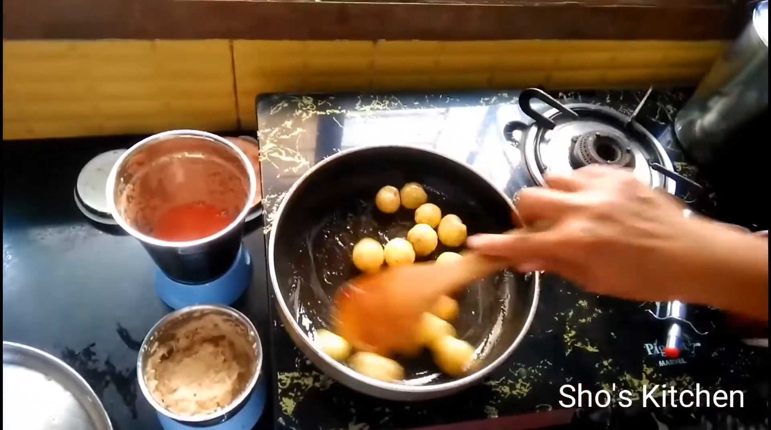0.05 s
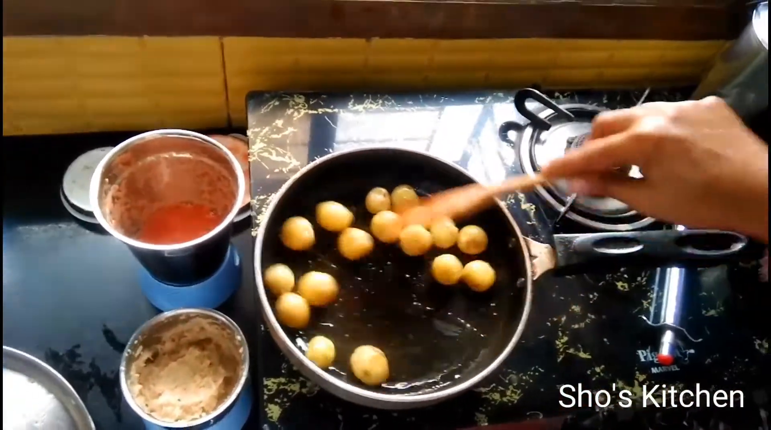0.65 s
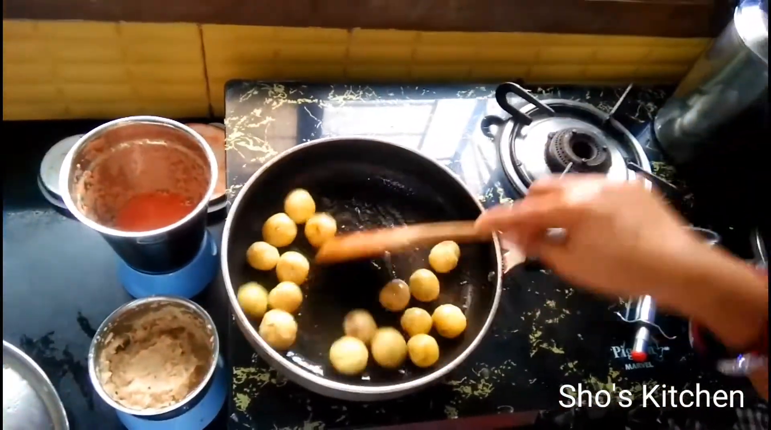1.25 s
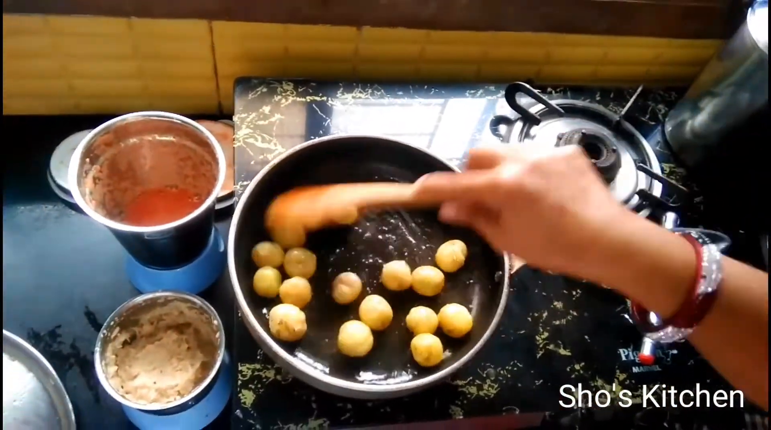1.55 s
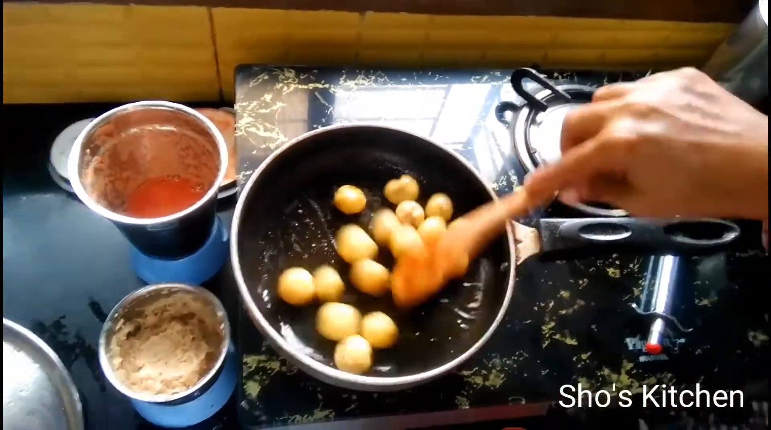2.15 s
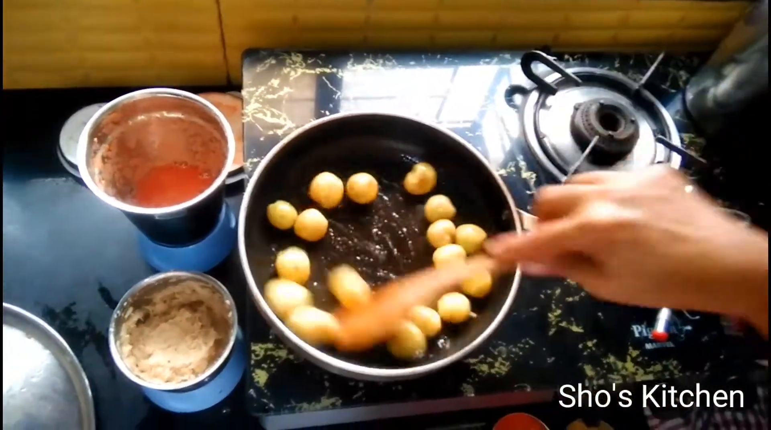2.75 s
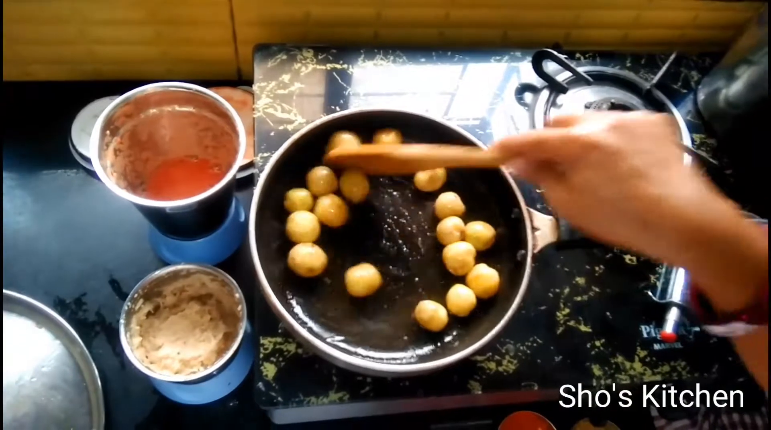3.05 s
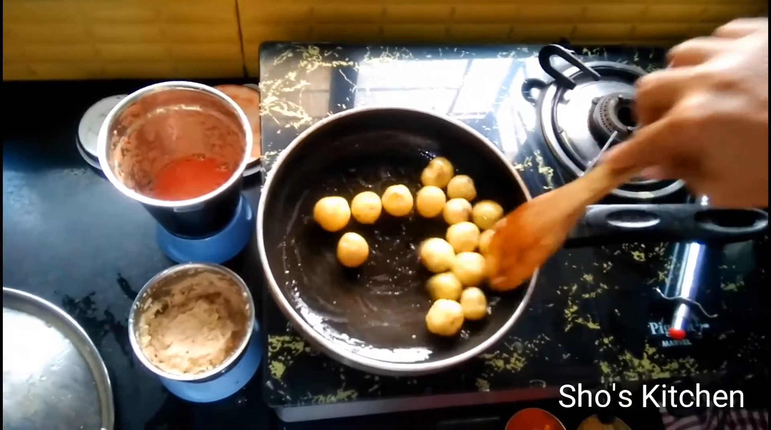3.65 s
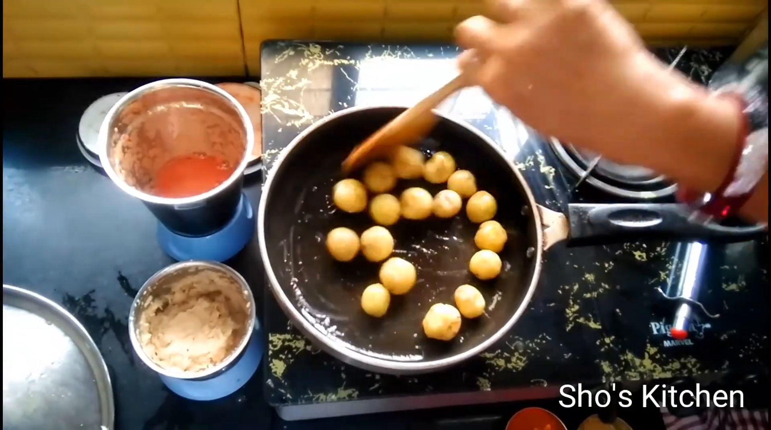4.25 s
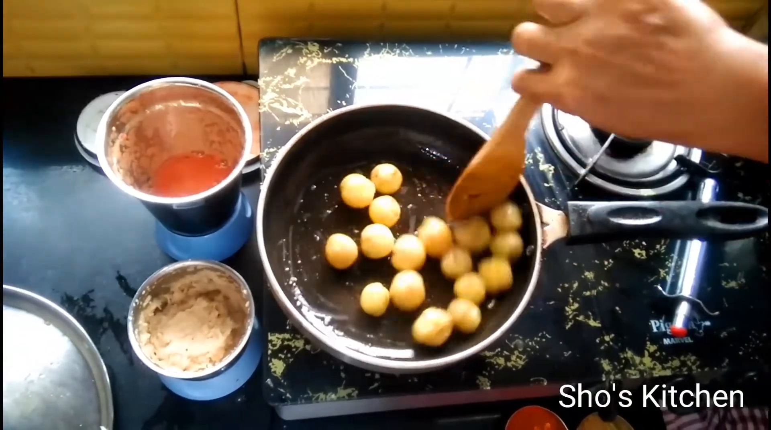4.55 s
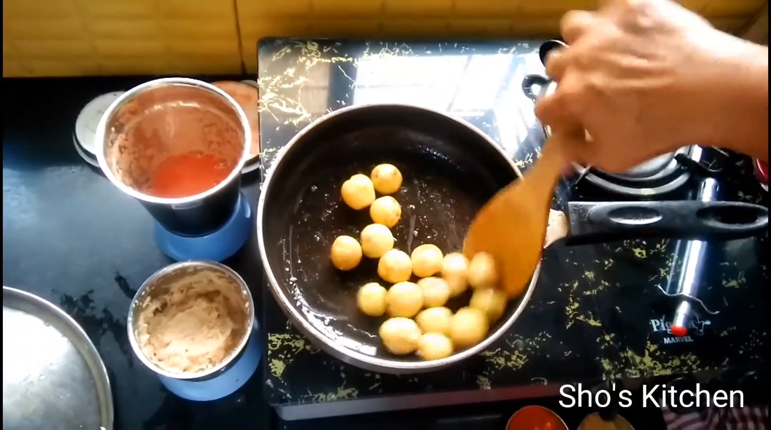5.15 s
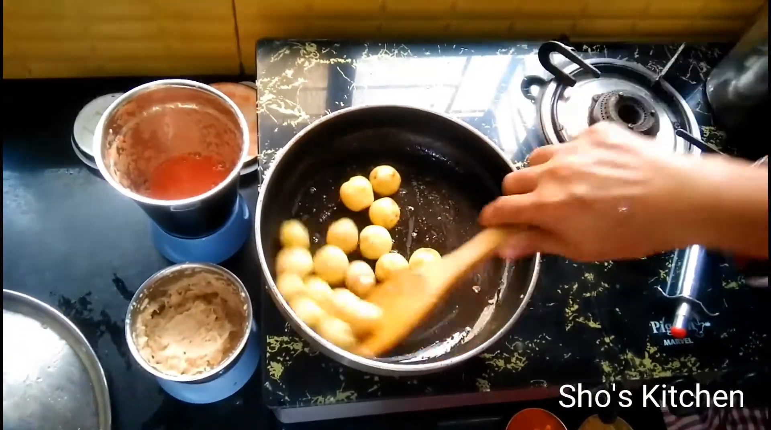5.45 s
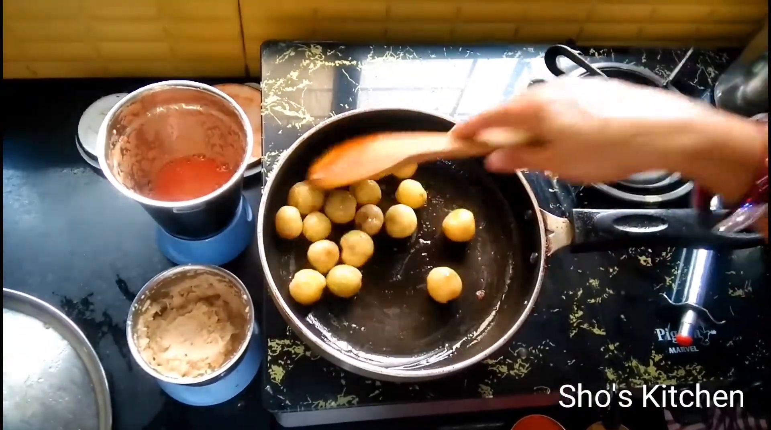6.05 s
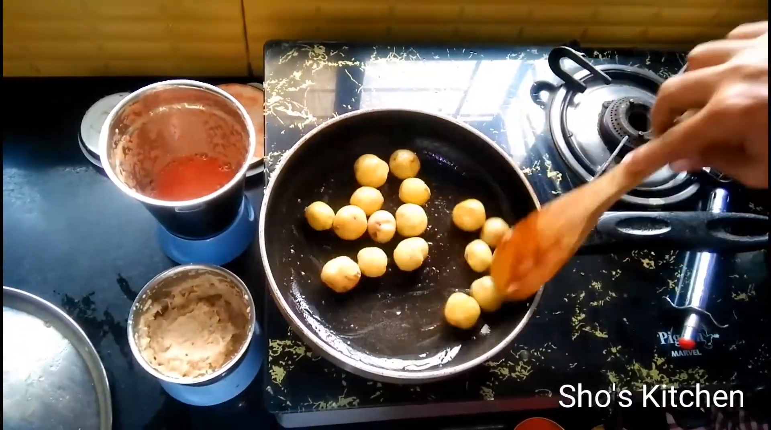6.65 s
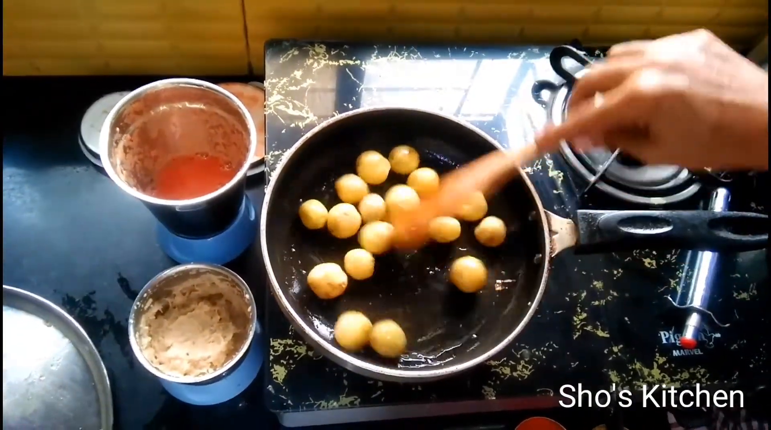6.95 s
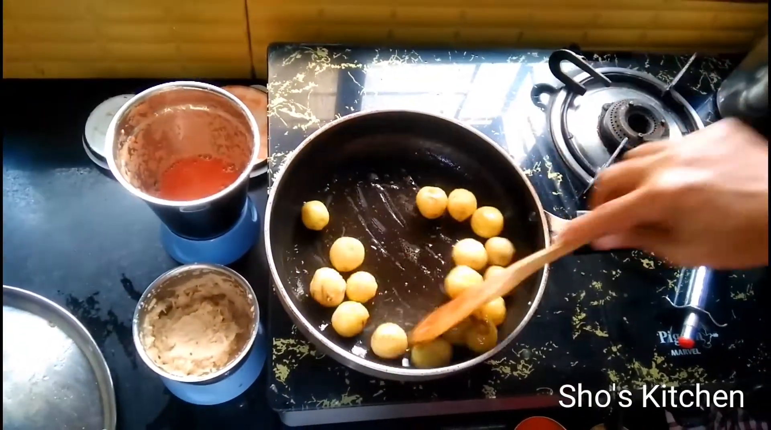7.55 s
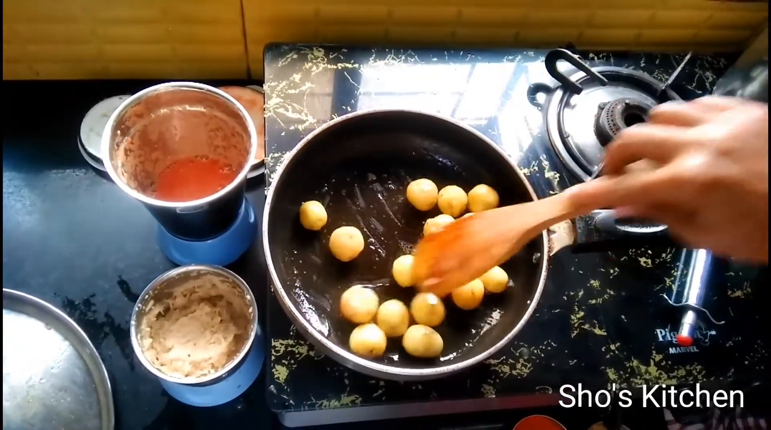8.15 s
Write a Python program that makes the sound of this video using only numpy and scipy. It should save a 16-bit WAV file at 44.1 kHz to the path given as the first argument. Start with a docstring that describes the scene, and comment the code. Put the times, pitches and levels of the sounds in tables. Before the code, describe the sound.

Potatoes fry in a pan, heard up close with the short echo of a small kitchen. From the start, hot fat gives a fine, high fizz with frequent snapping spits and sputters. A wooden spatula pushes the potatoes around two or three times a second, making wet rasps, light scrapes and soft, low tumbling bumps. Dull knocks on the pan wall come irregularly, the clearer ones near 0.6, 1.3, 2.2, 2.9, 3.3 and 4.2 seconds. At 4.7 seconds the wood clacks hard on the rim with a brief metallic ring, the loudest moment, followed by a cluster of duller knocks until 5.2. Stirring continues over slightly calmer fat, with another firm knock at 6.9. Near 7.7 seconds the pan rumbles on its stand and a last knock leaves the iron ringing faintly. Soft pushes and sizzling carry on to about 8.5 seconds.

```python
"""Boiled potatoes fry in ghee in a small kitchen. From the start the fat fizzes, and it spits and
flares as wet sides meet the hot metal, while a wooden spatula pushes the potatoes round with a wet
rasp, scraping the base and knocking dully on the wall. At 4.7 s the wood clacks hard on the rim.
The stirring goes on over calmer fat; near 7.7 s the pan rumbles on its stand, a last knock leaves
the iron ringing faintly, and the final pushes are soft."""
import sys
import numpy as np
from scipy import signal
from scipy.fft import rfft, irfft, next_fast_len
from scipy.io import wavfile
from scipy.ndimage import uniform_filter1d, map_coordinates

SR = 44100
rng = np.random.default_rng(int(sys.argv[2]) if len(sys.argv) > 2 else 0)


def master_out(mix):
    """Clip the mix to full scale and print it as 16-bit PCM to the path in sys.argv[1]."""
    frames = np.transpose(np.atleast_2d(mix))
    ceiling = np.clip(frames, -1, 1)
    pcm = np.round(ceiling * 32767).astype(np.int16)
    wavfile.write(sys.argv[1], SR, pcm)


N = 366905
T = np.arange(SR // 3) / SR  # time within one event

# Table levels are relative: each layer adds its own trim.
# The room's decay. Each row: frequency in Hz, time to fall by 60 dB in seconds.
ROOM_DECAY = [(200, 0.57), (1000, 0.68), (4000, 0.62), (12000, 0.16)]
# The pan shifting on its stand. Each row: time in seconds, rumble level in dB.
RUMBLE_LEVELS = [(0, -52.5), (.6, -58), (.85, -48.5), (1.3, -56.5), (1.55, -50), (2.3, -55.5), (2.42, -64),
                 (2.5, -55), (2.9, -54.5), (3.02, -43), (3.35, -57), (3.87, -48.5), (4.1, -54),
                 (5.6, -56.5), (6.4, -55), (7.52, -57), (7.67, -35.5), (7.95, -52.5), (8.32, -55)]
# The fat calming as the potatoes dry. Each row: time in seconds, fizz level in dB.
FIZZ_LEVELS = [(0.0, -41.5), (0.9, -46), (1.25, -43), (1.88, -45), (2.01, -45.5), (2.64, -47), (3.47, -46),
               (4.1, -46.5), (4.84, -46.5), (5.21, -53), (5.93, -46.5), (6.07, -53), (6.79, -46),
               (7.16, -52.5), (7.53, -48), (8.32, -52)]

# EQ curves. Each row: frequency in Hz, gain in dB.
STOVE_EQ = [(20, -29), (36, -39), (50, -4), (62, 3.5), (76, -8), (100, -10), (130, -14), (200, -16.5),
            (500, -73)]  # deep rumble under the pan
TUMBLE_EQ = [(90, -30), (140, -16.5), (187, 4.5), (228, -20), (266, 2.5), (330, -7), (410, -10), (600, -12),
             (1000, -22), (2000, -44)]  # soft bumps of potatoes
FIZZ_EQ = [(1200, -21), (3000, -42), (4500, -5.5), (6000, 3), (7000, 1.5), (8500, -1.5), (11000, -6),
           (12500, -4.5), (14000, -3)]  # fine steam bubbles
SIZZLE_EQ = [(700, -24), (1500, -18.5), (2400, -9.5), (3200, -5.5), (4400, -2.5), (5500, -2), (6600, -2),
             (7600, -6.5), (9000, -14), (11000, -21), (14000, -17.5)]  # coarse, wet pops
SCRAPE_EQ = [(250, -9.5), (450, -7), (650, -2), (950, 6), (1140, 3.5), (1300, 5.5), (1900, -0.5),
             (2400, -1.5), (3100, 3), (4200, -14), (6000, 6), (10000, -31)]  # wood dragged over metal
THUD_EQ = [(100, -37), (200, -1.5), (420, 5.5), (620, -3.5), (1000, 3), (1400, -9), (1900, 0), (2600, -0.5),
           (5000, -15.5)]  # wood in a dull knock
CRACK_EQ = [(290, -68), (500, -25), (720, -18), (1160, -31.5), (1670, -12), (1970, -21), (2470, -8.5),
            (2840, -12), (3090, -4), (4570, -13), (5560, -0.5), (7560, -11), (9870, -11.5), (12000, -26),
            (14200, -18.5)]  # wood in a hard hit

# Ringing metal. Each row: frequency in Hz, level in dB, time to fall by 60 dB in seconds.
PAN_MODES = [(194, -13, 0.7), (261, -2, 0.27), (377.3, -12, 0.29), (412, -6.5, 0.33), (485, -14.5, 0.45),
             (716, -12, 0.38), (993, -18, 0.12), (988, -1.5, 0.016), (1147.5, 2.5, 0.13),
             (1422, -3.5, 0.051), (1640, -16, 0.021), (1829, -1, 0.059), (1860, 1, 0.078),
             (2156, -1, 0.052)]  # the body on its stand
RIM_MODES = [(704, -10, .2), (1630, -9, .2), (3004, -4, .17), (3213, -5, .17), (3920, -6, .15),
             (4010, -6, .15), (5090, -1, .17), (5330, -2, .15), (5465, 1, .2), (5580, 0, .15),
             (5985, -2, .15), (6177, -2, .17), (6410, 0, .17), (6548, -1, .17), (8909, -11, .15),
             (9517, -10, .15)]  # the bright rim

# Spatula pushes. Each row: start and length in seconds, rasp, scrape and rolling levels in dB,
# pitch of the rasp in Hz.
PUSHES = [(0.0, 0.33, -26.5, -49.5, -52.5, 5670), (0.423, 0.26, -28, -47.5, -53.5, 5350),
          (0.801, 0.19, -36, -51, -55, 5300), (1.047, 0.32, -35, -47.5, -55.5, 6070),
          (1.395, .24, -32.5, -48, -63, 5330), (1.763, 0.14, -36.5, -49.5, -51.5, 5460),
          (2.22, .1, -35, -68, -55.5, 4720), (2.71, 0.22, -41.5, -64, -53.5, 5840),
          (2.92, 0.43, -38.5, -58.5, -48, 5770), (3.582, 0.19, -35.5, -57.5, -63.5, 5770),
          (3.887, 0.049, -38, -66, -63, 5380), (4.358, 0.38, -35.5, -53, -51, 5760),
          (4.873, 0.46, -39, -47, -48, 5250), (5.712, 0.074, -39, -55.5, -56.5, 5800),
          (5.906, 0.14, -37.5, -50, -55, 5680), (6.192, 0.25, -37.5, -44.5, -46, 5450),
          (6.54, 0.13, -34, -55, -52.5, 5170), (6.82, 0.25, -39, -54, -52, 5720),
          (7.42, 0.15, -46.5, -57, -57, 4850), (7.586, 0.41, -54, -51, -50.5, 5470),
          (8.13, 0.31, -54, -56.5, -56.5, 6200)]
# What coasts on after a push. The three values: rasp, scrape and rolling in dB against the push.
COASTING_DB = [-9, -10, -7.5]
# Quick swipes of the edge. Each row: peak time in seconds, level in dB, swell and fade time constant
# in seconds, pitch in Hz, low rub in dB against the swish.
EDGE_SWIPES = [(.94, -41, 0.015, 2900, -9.5), (1.119, -44.5, .033, 4050, -24),
               (1.436, -32, 0.016, 4770, -24), (1.866, -37, 0.0076, 3180, -1),
               (2.253, -35.5, 0.023, 4620, -29), (5.339, -31.5, .012, 4100, -21),
               (6.391, -32.5, 0.017, 3770, -7.5), (7.46, -40, 0.048, 5000, -9),
               (7.93, -45.5, 0.021, 3240, 1)]
# Dull blows on the pan. Each row: start in seconds, level in dB, treble cut-off in Hz,
# low thump gain in dB, pitch of the tap in Hz.
WALL_KNOCKS = [(.486, -36.5, 643, 3, 476), (.579, -29.5, 720, 9.5, 405), (.6, -39, 495, 19, 307),
               (1.2821, -26.5, 1380, -4.5, 1152), (1.679, -40.5, 1010, 0, 409), (1.817, -38, 1140, 22, 382),
               (2.158, -28, 2630, 2, 1006), (2.493, -36.5, 244, 16, 172), (2.874, -24.5, 2320, -1.5, 1130),
               (3.181, -38.5, 1400, 1, 990), (3.272, -27, 1820, -5, 983), (4.2087, -24.5, 1360, -5, 1131),
               (4.581, -35.5, 713, 2, 342), (4.892, -29.5, 1750, 7, 500), (4.93, -28, 1600, 2, 300),
               (5.109, -23, 2040, -5, 1455), (5.115, -25.5, 390, 7, 269), (5.154, -31.5, 1610, -2, 270),
               (5.195, -27.5, 1750, 2, 1380), (5.669, -51, 2100, -3, 1920), (6.15, -39.5, 820, -8, 454),
               (6.784, -40.5, 500, 18, 272), (6.907, -21.5, 2980, 2.5, 1955),
               (7.7248, -23, 1770, -4.5, 414)]
# The spatula chattering on the rim. Each row: start in seconds, level in dB.
RIM_HITS = [(4.7018, -10), (4.7072, -7), (4.7145, -17), (4.7285, -39), (4.7392, -18)]
# Wet spots meeting hot fat. Each row: start in seconds, snap, sputter and flare levels in dB.
BIG_SPITS = [(.0961, -23, -29.5, -48), (.1788, -18, -31.5, -58), (.426, -25, -30, -51),
             (.4358, -18, -35, -40), (.5773, -22, -29.5, -49), (.6275, -18, -43, -38.5),
             (.8702, -17.5, -27.5, -58), (1.1014, -26, -43, -44.5), (1.2084, -31, -30.5, -43),
             (1.5252, -20, -29, -52), (1.6158, -16.5, -29, -59), (1.7879, -23, -33, -41),
             (1.9879, -26, -49, -38.5), (2.144, -38, -41, -37.5), (2.3903, -28, -41, -38),
             (2.7306, -28, -33.5, -38), (3.079, -23, -32.5, -42), (3.261, -20.5, -37, -43),
             (3.321, -28, -29, -40), (3.4207, -26, -30.5, -52), (3.4664, -23.5, -36, -41.5),
             (3.6066, -20, -29, -45), (3.664, -28, -28.5, -42), (3.917, -26, -32, -64),
             (3.9502, -24, -40, -59), (3.9948, -27, -40, -41), (4.389, -16, -28.5, -52),
             (4.4267, -32, -26, -41.5), (4.461, -21, -36, -50), (4.5348, -20.5, -43, -61),
             (4.9265, -25, -41, -64), (4.9685, -38, -30, -50), (5.458, -38, -37, -44),
             (5.7344, -34, -36.5, -43.5), (5.9199, -35, -32, -39.5), (5.9446, -24, -34, -60),
             (5.9837, -24.5, -40, -44), (6.3508, -27, -40, -51), (6.551, -25, -32, -46),
             (6.7865, -41, -45, -43), (6.865, -31, -28.5, -46), (7.634, -38, -44, -47),
             (7.7875, -24.5, -37, -46.5), (7.9, -42, -40, -44)]

PUSH_ATTACK_S, PUSH_T60_S, COAST_T60_S = 0.023, 0.37, 3.7
SPIT_PITCH_SCATTER = 0.043  # share of the rasp's pitch
SMALL_SPITS_PER_S = 5
SMALL_SNAP_DB, SMALL_SPUTTER_DB, SMALL_FLARE_DB = 17.5, 6, -6  # added to FIZZ_LEVELS
TOP_HZ = 14350


def amp(db):
    """Decibels to gain."""
    return 10 ** (np.asarray(db) / 20)


def unit(x):
    """Scale to rms 1."""
    return x / np.sqrt(np.mean(x ** 2) + 1e-20)


def crest(x, size=176):
    """Scale so that the loudest stretch of size samples has rms 1."""
    return x / np.sqrt(uniform_filter1d(x ** 2, size).max())


def along(points, hz):
    """Read (Hz, value) points on a log frequency axis."""
    freqs, values = np.transpose(points)
    return np.interp(np.log(hz + 1), np.log(freqs + 1), values)


def automation(points):
    """Join (seconds, value) points into one value per sample."""
    return np.interp(np.arange(N) / SR, *np.transpose(points))


def wobble(rate, n=N):
    """A smooth random curve, rate knots a second."""
    knots = rng.standard_normal(int(n * rate / SR) + 4)
    return map_coordinates(knots, [np.arange(n) * rate / SR])


def fade(t60):
    """Exponential decay over one event, 60 dB down after t60 seconds."""
    return amp(-60 * T / t60)


def colour(x, points):
    """Causal (minimum-phase) EQ through the (Hz, dB) points."""
    m = 2 * next_fast_len(len(x) // 2 + 1024)
    gain = amp(along(points, np.fft.rfftfreq(m, 1 / SR)))
    cepstrum = irfft(np.log(gain))
    cepstrum[1:m // 2] *= 2
    cepstrum[m // 2 + 1:] = 0
    return irfft(rfft(x, m) * np.exp(rfft(cepstrum)))[:len(x)]


def resonate(x, hz, q):
    """One resonance of gain 1 at its centre."""
    return signal.lfilter(*signal.iirpeak(hz, q, fs=SR), x)


def sweep(x, centre, octaves, boost_db):
    """A bell boost that follows the (seconds, Hz) points of centre."""
    hz, t, spectrum = signal.stft(x, SR, nperseg=512)
    offset = np.log2((hz[:, None] + 1) / np.interp(t, *np.transpose(centre))) / octaves
    bell = amp(boost_db / (1 + offset ** 2))
    return signal.istft(spectrum * bell, nperseg=512)[1][:len(x)]


def patchy(x, patch_db, size=5):
    """Contact points come and go, each favouring its own narrow band for a moment."""
    spectrum = signal.stft(x, nperseg=512)[2]
    bands = uniform_filter1d(rng.standard_normal(spectrum.shape), size // 2 + 1, axis=0)
    patches = unit(uniform_filter1d(bands, size * 2, axis=1))
    return unit(signal.istft(spectrum * amp(patch_db * patches), nperseg=512)[1][:len(x)])


def grains(n, rate, spread_db):
    """Tiny clicks of log-normal size, about rate a second."""
    clicks = (rng.random(n) < rate / SR) * rng.choice([-1, 1], n)
    sizes = amp(spread_db * np.minimum(rng.standard_normal(n), 2.6))
    return unit(clicks * sizes)


def ring(modes, scatter_db):
    """Damped modes, struck at slightly new strengths each time."""
    out = np.zeros(len(T))
    for hz, db, t60 in modes:
        strength = amp(db + scatter_db * rng.standard_normal()) * rng.choice([-1, 1])
        out += strength * fade(t60) * np.sin(2 * np.pi * hz * T)
    return out


def in_pan(x, modes, ring_db):
    """Part of a contact sound goes through the metal's modes."""
    ringing = signal.fftconvolve(x, ring(modes, scatter_db=3))[:len(x)]
    return unit(unit(x) + amp(ring_db) * unit(ringing))


def add(track, s, sound):
    """Mix a sound into the track at s seconds."""
    start = max(round(s * SR), 0)
    track[start:start + len(sound)] += sound[:N - start]


def kitchen(x):
    """The tiled walls answer after 6 ms and die away quickly, the top end first."""
    hz, t, noise = signal.stft(rng.standard_normal(len(T)), SR, nperseg=256)
    decay = amp(-60 * t / along(ROOM_DECAY, hz)[:, None])
    tail = signal.istft(noise * decay, SR, nperseg=256)[1]
    delayed = np.pad(x, (round(.006 * SR), 0))
    return signal.fftconvolve(delayed, tail / np.linalg.norm(tail))[:N]


def stand_ring(hz=905, db=-58, t60=3):
    """The last knock leaves the iron stand ringing faintly and unsteadily."""
    age = np.maximum(np.arange(N) / SR - WALL_KNOCKS[-1][0], 0)
    envelope = amp(db - 60 * age / t60) * (age > 0)
    return envelope * np.sin(2 * np.pi * hz * age + wobble(6.7))


def rolling(gain):
    """The low end: tumbling potatoes bump on the base and the stove rumbles beneath the pan."""
    bumps = grains(N, rate=900, spread_db=3) * amp(3 * wobble(16))
    tumble = unit(colour(bumps, TUMBLE_EQ))
    stove = unit(colour(rng.standard_normal(N), STOVE_EQ) * amp(2.8 * wobble(22)))
    return amp(1.0) * gain * tumble + amp(automation(RUMBLE_LEVELS) - 0.5) * stove


def frying():
    """The bed of fizz: tiny steam bubbles burst in clumps all over the hot fat."""
    bursts = grains(N, rate=9300, spread_db=-3.0) * amp(2.44 * wobble(70))
    level_db = automation(FIZZ_LEVELS) + 5.0 + 0.56 * wobble(17)
    return amp(level_db) * unit(colour(bursts, FIZZ_EQ))


def push_envelopes():
    """Rasp, scrape and rolling gains: each push speeds up, holds and lets go; the potatoes coast on."""
    t, power = np.arange(N) / SR, np.zeros((3, N))
    for s, length, *levels_db, _ in PUSHES:
        attack = np.clip((t - s) / PUSH_ATTACK_S, 0, 1)
        after = np.maximum(t - s - length, 0)
        coast = np.outer(amp(COASTING_DB), amp(-60 * after / COAST_T60_S))
        release = np.maximum(amp(-60 * after / PUSH_T60_S), coast)
        power += (amp(levels_db)[:, None] * attack * release) ** 2
    return np.sqrt(power)


def contact_pitch(s):
    """Each push sets the pitch at which the fat rasps and spits: Hz at s seconds."""
    midpoints = [(start + length / 2, hz) for start, length, *_, hz in PUSHES]
    return np.interp(s, *np.transpose(midpoints))


def scraping(gain):
    """Wood catches and slips on the base, lightly ringing the pan."""
    slips = grains(N, rate=3000, spread_db=3.5) * amp(2.5 * wobble(45))
    rub = in_pan(colour(slips, SCRAPE_EQ), PAN_MODES, ring_db=-9)
    return gain * patchy(rub, patch_db=6.5)


def swipes():
    """The spatula's edge speeds up and slows down: a swelling swish over a lower rub of the pan."""
    out = np.zeros(N)
    middle = T[-1] / 2
    for s, db, swell_s, hz, rub_db in EDGE_SWIPES:
        slips = grains(len(T), rate=5000, spread_db=3) * amp(2.5 * wobble(150, len(T)))
        swish = colour(slips, SIZZLE_EQ)
        swish = unit(swish + amp(7) * resonate(swish, hz, q=3.1))
        rub = in_pan(colour(slips, SCRAPE_EQ), PAN_MODES, ring_db=-18)
        speed = np.exp(0.65 - np.hypot((T - middle) / swell_s, .7))  # a rounded peak
        swipe = speed * patchy(swish + amp(rub_db) * rub, patch_db=2.5)
        add(out, s - middle, amp(db + 4.0) * swipe)
    return out


def wet_rasp(gain, wander=0.1, wander_per_s=14):
    """Potatoes stick and slip on the greasy metal; the pitch strays as the contact shifts."""
    slips = grains(N, rate=7000, spread_db=4) * amp(1.8 * wobble(80))
    rasp = in_pan(colour(slips, SIZZLE_EQ), RIM_MODES, ring_db=-15)
    t = np.arange(N) / SR
    hz = contact_pitch(t) * np.exp(wander * wobble(wander_per_s))
    rasp = sweep(rasp, np.column_stack([t, hz]), octaves=.09, boost_db=9)
    return amp(-3.0) * gain * patchy(rasp, patch_db=3.8, size=4)


def knocks():
    """Each blow rings the pan and thuds in the wood at its own pitch; a softer contact is duller."""
    out = np.zeros(N)
    dying = fade(0.13) + amp(-11) * fade(0.36)
    for s, db, contact_hz, thump_db, tap_hz in WALL_KNOCKS:
        metal = crest(ring(PAN_MODES, scatter_db=2), size=700)
        thud = crest(colour(rng.standard_normal(len(T)) * dying, THUD_EQ), size=700)
        tap = np.sin(2 * np.pi * tap_hz * T) * fade(0.14)
        blow = metal + amp(2.5) * thud + amp(3.0) * tap
        # a small pan radiates little deep bass
        blow = colour(blow, [(70, -16.0), (190, thump_db), (300, thump_db), (800, -2.0)])
        blow = signal.sosfilt(signal.butter(5, contact_hz, fs=SR, output="sos"), blow)
        add(out, s, amp(db - 2.5) * crest(blow, size=700))
    return out


def rim_clack():
    """Hard wood chatters on the rim: sharp cracks with a brief metallic ring."""
    out = np.zeros(N)
    dying = fade(0.014) + amp(1.5) * fade(0.27)
    for s, db in RIM_HITS:
        crack = crest(colour(rng.standard_normal(len(T)) * dying, CRACK_EQ))
        metal = crest(ring(RIM_MODES, scatter_db=1))
        add(out, s, amp(db - 4.0) * (crack + amp(-6.5) * metal))
    return out


def small_spits():
    """Lesser spits come at random moments, as strong as the fat is lively."""
    times = np.flatnonzero(rng.random(N) < SMALL_SPITS_PER_S / SR) / SR
    fizz_db = np.interp(times, *np.transpose(FIZZ_LEVELS))
    return spits([(s, db + SMALL_SNAP_DB, db + SMALL_SPUTTER_DB, db + SMALL_FLARE_DB)
                  for s, db in zip(times, fizz_db)])


def spits(rows):
    """A wet spot snaps as it meets the fat, sputters near the same pitch and boils off as fizz."""
    out = np.zeros(N)
    click = signal.unit_impulse(256)
    coarse_pop, fine_pop = colour(click, SIZZLE_EQ), colour(click, FIZZ_EQ)
    ping_shape = fade(0.0095) * (1 - fade(0.0015))
    flare_shape = fade(0.35) + amp(-12) * fade(0.034)
    play = lambda bursts, pop: signal.oaconvolve(bursts, pop)[:len(T)]
    for s, snap_db, sputter_db, flare_db in rows:
        hz = contact_pitch(s) * np.exp(SPIT_PITCH_SCATTER * rng.standard_normal())
        ping = crest(np.sin(2 * np.pi * hz * T) * ping_shape, size=66)
        crack = crest(play(rng.standard_normal(len(T)) * fade(0.014), coarse_pop), size=66)
        snap = crest(ping + amp(-6.0) * crack, size=66)
        sputter = play(grains(len(T), rate=4000, spread_db=2.0) * fade(0.17), coarse_pop)
        sputter = crest(sputter + amp(8) * resonate(sputter, hz, q=10), size=1000)
        bubbles = grains(len(T), rate=9000, spread_db=4.0) * flare_shape
        flare = crest(play(bubbles, fine_pop), size=1000)
        spit = amp(snap_db - 0.5) * snap + amp(sputter_db + 0.13) * sputter + amp(flare_db + 8) * flare
        add(out, s, spit)
    return out


def scene():
    """Frying and stirring up close, the room behind, and a dry low end underneath."""
    rasp_gain, scrape_gain, roll_gain = push_envelopes()
    hits = spits(BIG_SPITS) + knocks() + rim_clack()
    textures = frying() + wet_rasp(rasp_gain) + scraping(scrape_gain) + swipes()
    low_end = rolling(roll_gain) + stand_ring()
    close = hits + textures + small_spits()
    return (close + amp(-13.5) * kitchen(close) + low_end)[None]


def record(dry):
    """A brick-wall low-pass takes off the air above TOP_HZ."""
    m = next_fast_len(N + SR // 2)
    passband = np.fft.rfftfreq(m, 1 / SR) < TOP_HZ
    return irfft(rfft(dry, m) * passband, m)[..., :N]


dry = scene()
out = record(dry)
master_out(out)
```